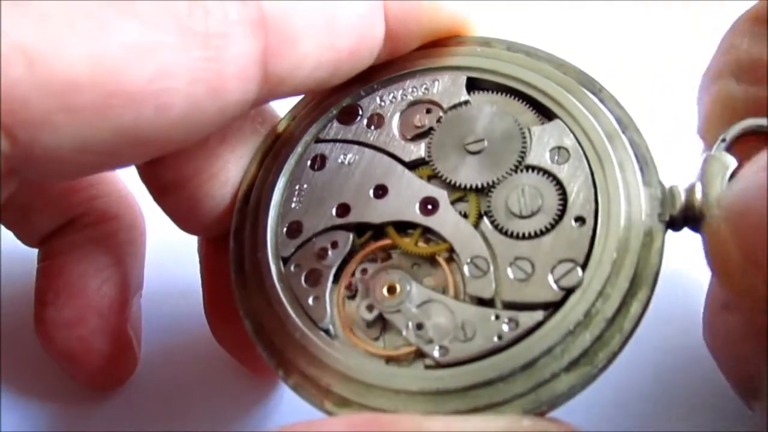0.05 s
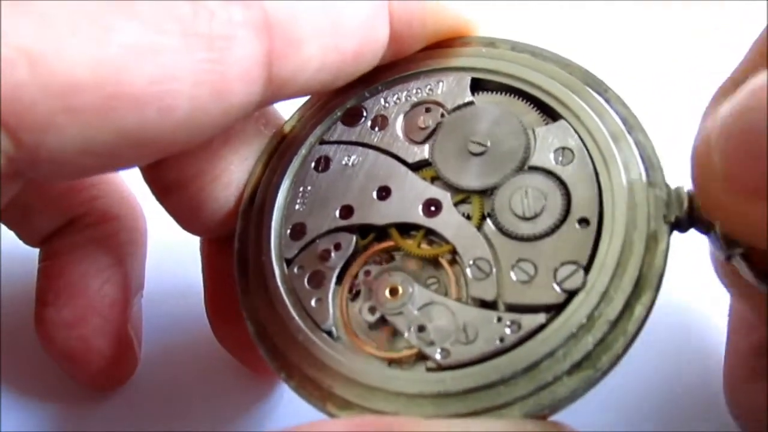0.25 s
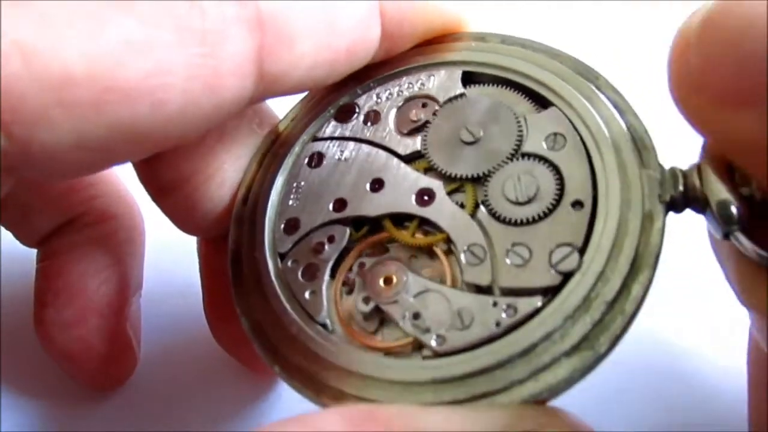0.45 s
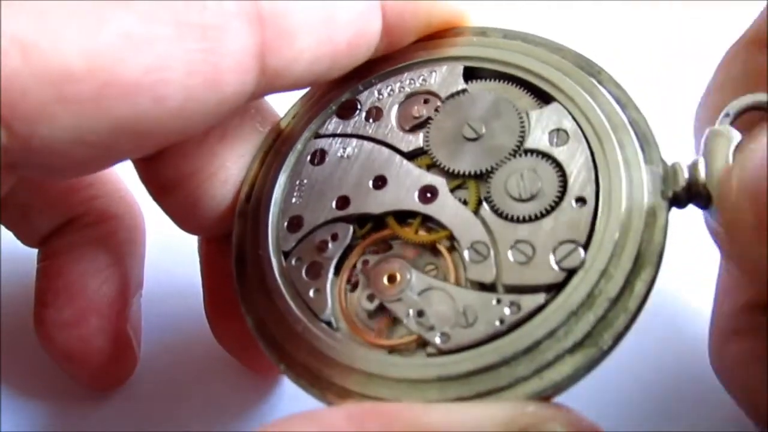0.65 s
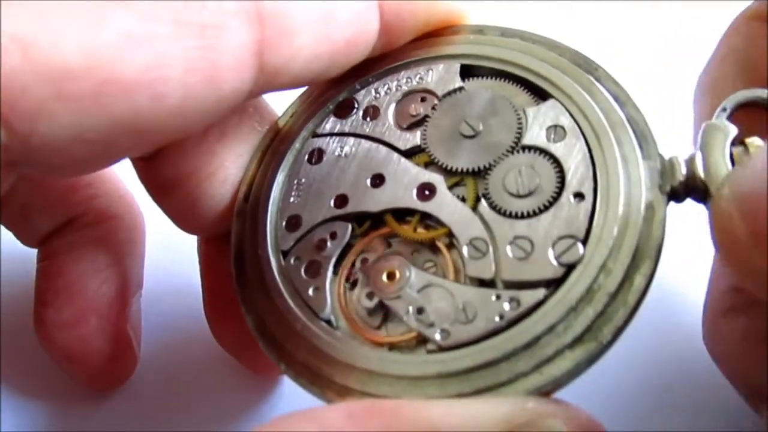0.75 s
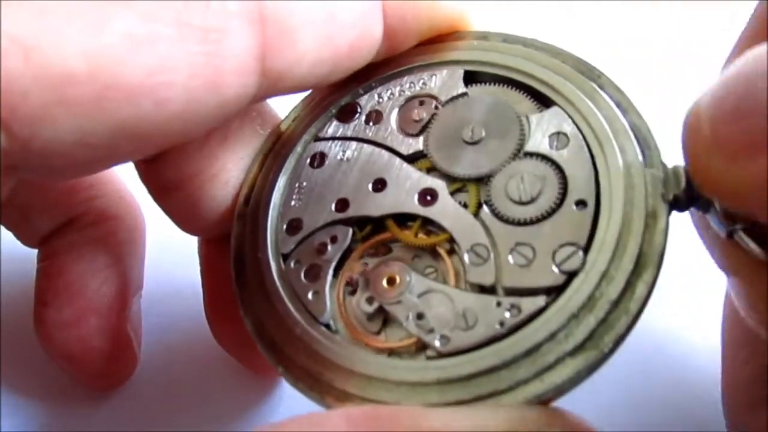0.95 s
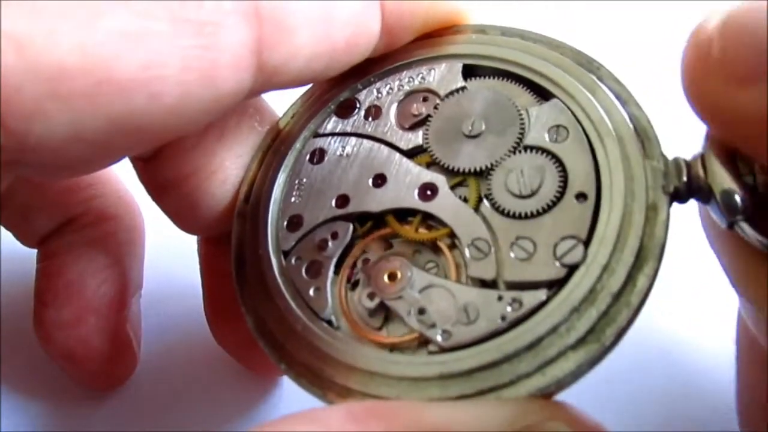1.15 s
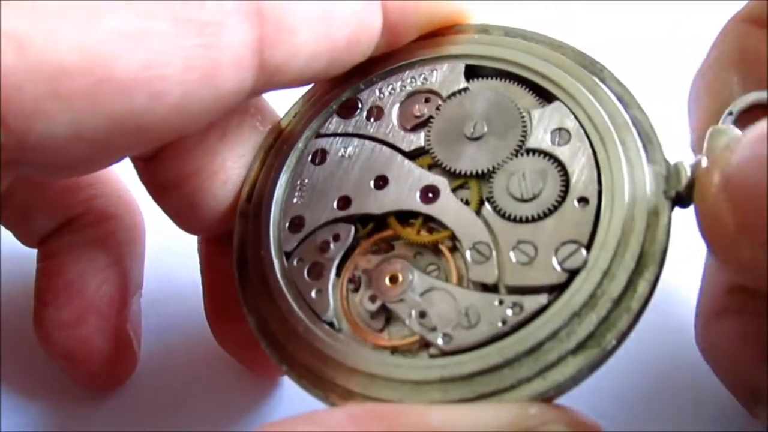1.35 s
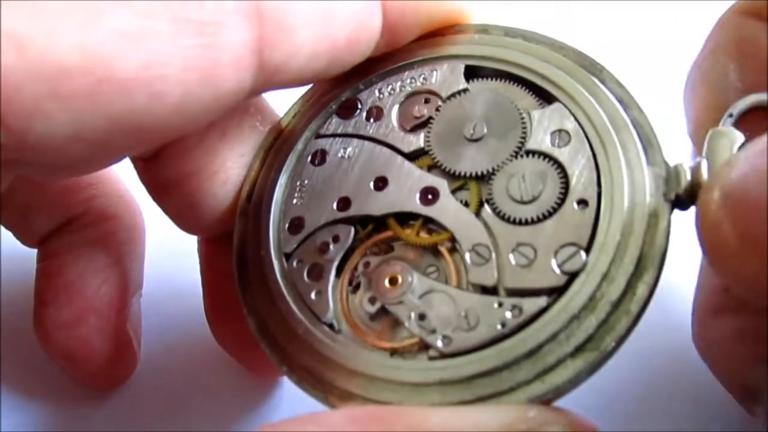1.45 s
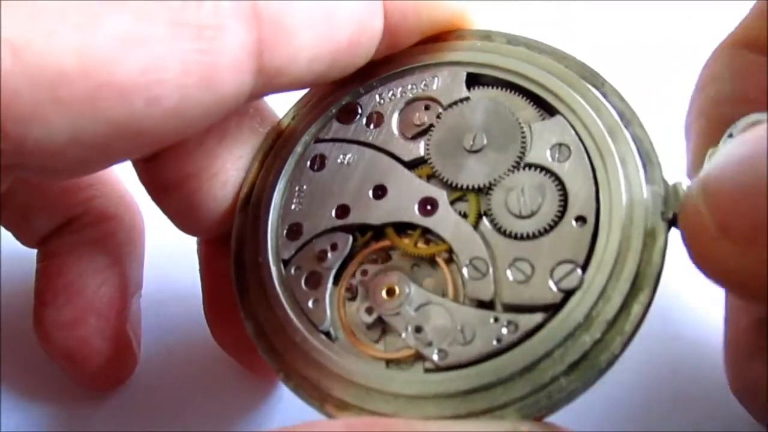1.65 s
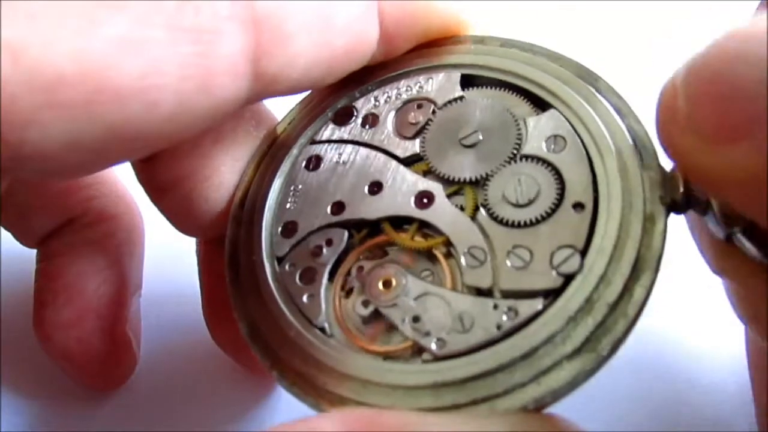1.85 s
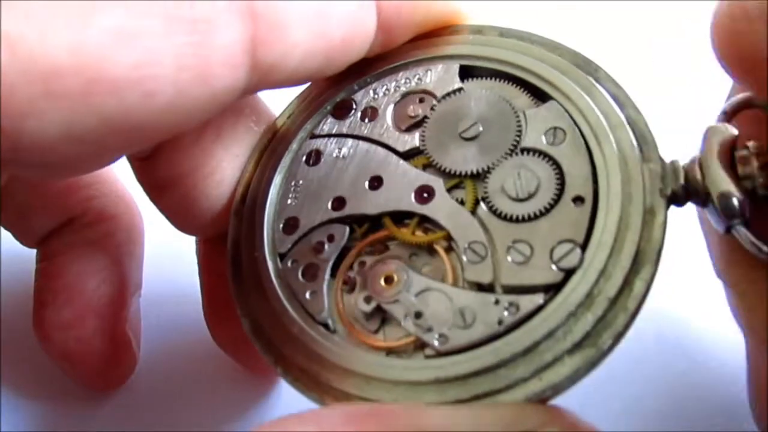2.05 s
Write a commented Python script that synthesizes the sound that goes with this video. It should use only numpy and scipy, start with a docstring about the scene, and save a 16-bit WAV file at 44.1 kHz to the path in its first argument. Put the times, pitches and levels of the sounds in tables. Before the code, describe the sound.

A pocket watch is wound close by in a quiet room. Crisp ratchet clicks run from 0.2 to 0.4 seconds, followed by a small knock and softer clicks as the crown turns back. A second burst comes around 0.9 seconds, then another knock and softer clicks until 1.5. A third burst at 1.7 ends in three faint clicks. Faint handling bumps and dull swells of distant noise lie underneath.

```python
"""A pocket watch is wound close by, over quiet room noise and an uneven low rumble. On a forward twist
the pawl snaps over the ratchet teeth and the gears rasp; each click rings for milliseconds and returns
from nearby surfaces. The hand bumps, the crown knocks as it reverses, and the clutch slips back with
softer, duller clicks. A second twist and knock follow; soft, dull swells of distant noise rise and fade
through the next return and a third twist. Three faint clutch clicks end the winding."""
import sys
import numpy as np
from scipy import signal
from scipy.fft import rfft, irfft
from scipy.io import wavfile

SR = 44100
rng = np.random.default_rng(int(sys.argv[2]) if len(sys.argv) > 2 else 0)


def dump_mix(stems):
    """Bounce the given channels to the path in sys.argv[1] as a 16-bit WAV at rate SR."""
    frames = np.atleast_2d(stems).T  # one column per channel
    limited = np.clip(frames, -1, 1)  # hard clip at full scale
    pcm = np.round(limited * 32767).astype(np.int16)
    wavfile.write(sys.argv[1], SR, pcm)


N = 92610
TIME_S = np.arange(N) / SR


def from_db(db):
    """Decibels to gain."""
    return 10 ** (np.asarray(db) / 20)


def at_hz(points, hz):
    """Interpolate a table along log frequency."""
    points_hz, values = np.transpose(points)
    return np.interp(np.log(hz + 1e-3), np.log(points_hz), values)


def unit_energy(x):
    """Scale to a mean energy of 1 per channel."""
    return x / np.sqrt(np.mean(np.sum(x ** 2, axis=-1)) + 1e-20)


def band(x, edges_hz):
    """Butterworth band-pass."""
    return signal.sosfilt(signal.butter(2, edges_hz, "band", fs=SR, output="sos"), x)


def stereo(mid, side):
    """Mid and side to left and right."""
    return np.array([mid + side, mid - side])


def decay(t, t60_s):
    """Exponential fall, 60 dB in t60_s."""
    return np.exp(-np.log(1000) * t / t60_s)


def swell(peak_s, width_s, level_db):
    """Gaussian envelope."""
    return from_db(level_db) * np.exp(-((TIME_S - peak_s) / width_s) ** 2)


def noise(spectrum, correlation):
    """Stereo noise, rms 1; left-right correlation is a number or a table over frequency."""
    hz = np.fft.rfftfreq(N, 1 / SR)
    mid, side = rfft(rng.standard_normal((2, N)))
    alike = correlation if np.isscalar(correlation) else at_hz(correlation, hz)
    white = stereo(np.sqrt(1 + alike) * mid, np.sqrt(1 - alike) * side)
    return unit_energy(irfft(white * from_db(at_hz(spectrum, hz)), N)) * np.sqrt(N)


# Room noise spectrum: freq_hz, relative_db
ROOM_SPECTRUM = [(25, -23), (60, -11), (125, -3.5), (300, -1.5), (600, -3), (1000, -5), (1700, -10.5),
                 (2500, -21), (5000, -28), (10000, -23.5), (16000, -31)]
# Room noise left-right likeness: freq_hz, correlation
ROOM_CORRELATION = [(150, 0.93), (300, -0.056), (600, -0.37), (1200, -0.46), (2000, 0.28), (5000, 0.81),
                    (15000, 0.099)]


def room_noise():
    """Steady, dull noise of the room."""
    return from_db(-53.5) * noise(ROOM_SPECTRUM, ROOM_CORRELATION)


# Rumble envelope: time_s, level_db
RUMBLE_LEVELS = [(0, -53), (.06, -73.5), (.42, -60), (1.0, -59.5), (1.199, -54.5), (1.4, -54),
                 (1.62, -54.5), (1.74, -61.5), (1.831, -50.5), (1.97, -67), (2.1, -48)]
# Rumble spectrum: freq_hz, relative_db
RUMBLE_SPECTRUM = [(40, -29), (75, -39), (108, 3), (150, -6), (270, -0.5), (370, -1.5), (500, -15.5),
                   (1200, -38)]


def rumble():
    """A centred low rumble comes and goes."""
    level_db = np.interp(TIME_S, *np.transpose(RUMBLE_LEVELS))
    return from_db(level_db) * noise(RUMBLE_SPECTRUM, correlation=1.0)


# Watch modes and their relative strength per striker: freq_hz, t60_s, pawl_db, clutch_db, knock_db
WATCH_MODES = [(1840, 0.026, -26, -30, -7.5), (2610, 0.0075, -15.5, -22, -2.5), (3170, 0.0054, -9, -8.5, 0),
               (4000, 0.0053, -10, -1.5, -1), (6636, 0.007, -15.5, -1, 1), (7083, 0.0052, -5.5, -2, -5),
               (8390, 0.0035, -6, -0.5, 2), (9550, 0.0028, 5, -13, -27), (10700, 0.0026, 3.5, -1, 9),
               (11440, 0.0037, -2.5, 0.5, -5), (12490, 0.0032, 5.5, 1.5, -9), (14800, 0.0014, 10, -2, -19)]
STEEL_ABOVE_HZ, WHEEL_HZ, CRACK_HZ = 6000, (7700, 9900), (8600, 15100)
SCATTER_DB, SCATTER_RAD = 0.34, 0.69
SIDE_DB, SIDE_DB_PER_OCT, PAN_DB = -16, 10, (-0.35, 0.35)
SLIDE_S, CLACK_EDGE_RATIO = 0.00071, 1.42


def clicks(events, striker, clack_hz, clack_share, rise_s, crack_db, crack_t60_s, slide_db):
    """Each contact slides, cracks, rings the steel and, more faintly, the case. Levels are over 1 ms."""
    modes = np.array(WATCH_MODES)
    hz, t60_s = modes[:, :1], modes[:, 1:2]
    struck_db = modes[:, [2 + ["pawl", "clutch", "knock"].index(striker)]]
    is_steel = hz > STEEL_ABOVE_HZ  # lower modes belong to the case
    is_wheel = (hz > WHEEL_HZ[0]) & (hz < WHEEL_HZ[1])
    octaves = np.log2(np.maximum(hz, STEEL_ABOVE_HZ) / hz.mean())
    side_gain = from_db(SIDE_DB + SIDE_DB_PER_OCT * octaves)
    alternating_rad = np.pi * np.arange(len(hz))[:, None]  # neighbouring modes start opposed
    steel_highpass = signal.butter(4, STEEL_ABOVE_HZ, "high", fs=SR, output="sos")
    clack_edges_hz = (clack_hz / CLACK_EDGE_RATIO, clack_hz * CLACK_EDGE_RATIO)

    lead, length = SR // 400, SR // 80
    from_impact_s = np.arange(-lead, length) / SR
    t = np.maximum(from_impact_s, 0)
    attack = 1 - np.exp(-(t / rise_s) ** 2)
    impact = from_db(crack_db) * unit_energy(attack * decay(t, crack_t60_s))
    slide = from_db(slide_db) * unit_energy(np.exp(-np.abs(from_impact_s) / SLIDE_S))
    contact = impact + slide

    out = np.zeros((2, N + length))
    for start_s, level_db, tilt_db_per_oct, wheel_db, case_db in events:
        mode_db = struck_db + tilt_db_per_oct * octaves + wheel_db * is_wheel
        strength = from_db(mode_db + SCATTER_DB * rng.standard_normal(hz.shape))
        phase_rad = alternating_rad + SCATTER_RAD * rng.standard_normal((2, len(hz), 1))
        mid, side = strength * attack * decay(t, t60_s) * np.sin(2 * np.pi * hz * t + phase_rad)
        side = side * side_gain * rng.choice([-1, 1], hz.shape)
        steel_ring = unit_energy(stereo((mid * is_steel).sum(axis=0), (side * is_steel).sum(axis=0)))
        case_ring = unit_energy((mid * ~is_steel).sum(axis=0))
        crack_mid, crack_side = band(rng.standard_normal((2, len(t))) * contact, CRACK_HZ)
        crack = unit_energy(stereo(crack_mid, side_gain[-1] * crack_side)) * np.linalg.norm(contact)
        steel = unit_energy(signal.sosfilt(steel_highpass, steel_ring + crack))
        clack = unit_energy(band(rng.standard_normal(len(t)) * contact, clack_edges_hz))
        case = unit_energy(np.sqrt(1 - clack_share) * case_ring + np.sqrt(clack_share) * clack)
        click = (steel + from_db(case_db) * case) * from_db(PAN_DB)[:, None]
        start = int(start_s * SR)
        out[:, start - lead:start + length] += from_db(level_db) * unit_energy(click)
    return out[:, :N] * np.sqrt(SR / 1000)


# Pawl drops: start_s, level_db, tilt_db_per_oct, wheel_db, case_db
PAWL_DROPS = [(0.1135, -42.8, 0.0, -4.0, -19.0), (0.2346, -24.1, -3.0, -6.0, -29.0),
              (0.2437, -22.7, 0.0, -0.0, -28.0), (0.2511, -20.5, -0.0, -2.0, -29.0),
              (0.2597, -22.3, 2.0, 2.0, -28.0), (0.2739, -23.1, -2.0, -0.0, -25.0),
              (0.2936, -22.2, 1.0, 1.0, -27.0), (0.3205, -22.1, -4.0, 2.0, -25.0),
              (0.3424, -21.0, -2.0, 3.0, -28.0), (0.3649, -21.9, 2.0, 4.0, -26.0),
              (0.3893, -21.6, -4.0, 2.0, -23.0), (0.8597, -36.9, 6.0, -6.0, -28.0),
              (0.903, -25.1, -7.0, 1.0, -24.0), (0.911, -24.4, 4.0, 8.0, -21.0),
              (0.9239, -21.4, 7.0, 3.0, -27.0), (0.9406, -22.4, 1.0, -0.0, -24.0),
              (0.9617, -21.5, 2.0, -1.0, -25.0), (0.9932, -21.4, -3.0, -1.0, -24.0),
              (1.0191, -21.5, -4.0, 3.0, -22.0), (1.0407, -22.4, -6.0, 1.0, -21.0),
              (1.7079, -21.9, 5.0, -5.0, -24.0), (1.7226, -25.7, -4.0, -5.0, -22.0),
              (1.7349, -25.1, 2.0, 1.0, -23.0), (1.748, -26.9, -4.0, -3.0, -20.0),
              (1.7756, -20.1, 2.0, -4.0, -22.0), (1.8354, -21.9, -8.0, 3.0, -21.0)]


def pawl():
    """The pawl snaps onto each ratchet tooth on the forward twist."""
    return clicks(PAWL_DROPS, "pawl", clack_hz=5170, clack_share=0.89, rise_s=0.00047,
                  crack_db=-9, crack_t60_s=0.002, slide_db=-12.5)


def stick_slip(grains_per_s=840, edges_hz=(4430, 12000)):
    """Tiny random friction grains, rms 1."""
    grains = (rng.random(N) < grains_per_s / SR) * rng.standard_normal(N)
    return unit_energy(band(grains, edges_hz)) * np.sqrt(N)


def gear_rasp(peak_db=-53, width_s=0.0063):
    """The gears rasp around each drop of the pawl."""
    turning = np.max([swell(start_s, width_s, db) for start_s, db, *_ in PAWL_DROPS], axis=0)
    return from_db(peak_db) * turning / turning.max() * stick_slip()


def diffuse_tail(t60_s, build_s):
    """Dense stereo echoes of unit energy."""
    t = np.arange(SR // 2) / SR
    return unit_energy(rng.standard_normal((2, len(t))) * decay(t, t60_s) * (1 - np.exp(-t / build_s)))


# Echoes off nearby surfaces: delay_s, left_db, right_db
NEAR_ECHOES = [(0.0097, -14, -21), (0.0125, -22, -22)]


def reflections(x, walls_db=-16, wall_cutoff_hz=17000, hand_db=-13):
    """Sound scatters between case and fingers, returns from nearby surfaces and dies away in the room."""
    wall_lowpass = signal.butter(2, wall_cutoff_hz, fs=SR, output="sos")
    walls = signal.sosfilt(wall_lowpass, diffuse_tail(t60_s=0.3, build_s=0.013))
    hand = diffuse_tail(t60_s=0.016, build_s=0.0012)
    response = from_db(walls_db) * walls + from_db(hand_db) * hand
    for delay_s, left_db, right_db in NEAR_ECHOES:
        response[:, int(delay_s * SR)] += from_db([left_db, right_db])
    return signal.fftconvolve(x, response, axes=1)[:, :N]


# Hand bumps: peak_s, width_s, level_db
HAND_BUMPS = [(.40, 0.054, -58.5), (.78, 0.24, -62), (.85, 0.05, -59), (1.48, 0.043, -54.5),
              (1.63, 0.082, -58.5), (2.07, 0.081, -64)]
# Bump spectrum: freq_hz, relative_db
BUMP_SPECTRUM = [(25, -20), (58, 9.5), (80, 2), (130, 9.5), (200, 3.5), (400, -45)]


def hand_bumps():
    """The hand bumps dully as the grip changes."""
    return sum(swell(*bump) for bump in HAND_BUMPS) * noise(BUMP_SPECTRUM, correlation=0.98)


# Crown knocks: start_s, level_db, tilt_db_per_oct, wheel_db, case_db, clack_hz
CROWN_KNOCKS = [(.454, -29, 2.5, -6, -10.5, 3350), (1.1309, -28.6, -2, 0.5, -8, 3720)]


def crown_knocks():
    """The crown takes up its play as it reverses."""
    return sum(clicks([knock], "knock", clack_hz, clack_share=0.83, rise_s=0.00024,
                      crack_db=-7, crack_t60_s=0.006, slide_db=-13.5)
               for *knock, clack_hz in CROWN_KNOCKS)


# Clutch slips: start_s, level_db, tilt_db_per_oct, wheel_db, case_db
CLUTCH_SLIPS = [(0.5805, -32.5, 2, -4, -29), (0.6048, -29.5, 8, -2, -16.5), (0.6072, -35, 6, -1, -20),
                (0.6267, -30, 6, -2, -19), (0.6457, -30.5, 2.5, -2.5, -18.5), (0.6596, -34.5, 3, 1, -25),
                (0.6815, -31.5, 10, 0, -23), (0.6842, -38.5, 16, -1, -16), (1.2437, -29.5, -13, 14, -27),
                (1.2685, -31.5, -2, -6, -12.5), (1.2844, -35, -8, -1, -23), (1.3013, -30, 10, 3, -28),
                (1.3179, -29.5, -4, -5, -20), (1.3389, -32.5, 9, 2, -19), (1.3922, -28, -6, -4, -25),
                (1.4933, -29.5, 1, -1.5, -29.5), (1.8642, -45, 13, -1, -8), (2.0289, -43, -5, -2, -12),
                (2.0925, -40.5, 4, 6, -15)]


def clutch():
    """The clutch teeth slip on the back twist."""
    return clicks(CLUTCH_SLIPS, "clutch", clack_hz=4540, clack_share=0.84, rise_s=0.00013,
                  crack_db=-12.5, crack_t60_s=0.015, slide_db=-13)


# Skin slides on the crown: peak_s, width_s, level_db
SKIN_SLIDES = [(0.879, 0.023, -62), (1.64, 0.05, -66)]


def skin_slides():
    """Skin sticks and slips on the knurled crown while finding a new grip."""
    return sum(swell(*slide) for slide in SKIN_SLIDES) * stick_slip()


# Swells of distant noise: start_s, peak_s, end_s, level_db
DISTANT_SWELLS = [(1.225, 1.322, 1.59, -50), (1.515, 1.664, 1.82, -56.5), (1.747, 1.834, 2.17, -49)]
# Distant noise spectrum: freq_hz, relative_db
DISTANT_SPECTRUM = [(100, -14), (260, 2), (600, -4.5), (1150, -5), (1620, -3.5), (1950, -8), (2300, -19.5),
                    (5000, -30)]


def distant_swells():
    """Soft, dull swells of distant noise rise and fade."""
    envelope = sum(from_db(db) * np.interp(TIME_S, times_s, [0, 1, 0]) for *times_s, db in DISTANT_SWELLS)
    return envelope * noise(DISTANT_SPECTRUM, correlation=0.76)


def scene():
    """The watch in the hand, in its room."""
    winding = pawl() + gear_rasp() + crown_knocks() + clutch() + skin_slides()
    return room_noise() + rumble() + winding + reflections(winding) + hand_bumps() + distant_swells()


def record(dry):
    """Steep low-pass at 16 kHz."""
    return signal.sosfilt(signal.ellip(10, .2, 80, 16000, fs=SR, output="sos"), dry)


dry = scene()
out = record(dry)
dump_mix(out)
```